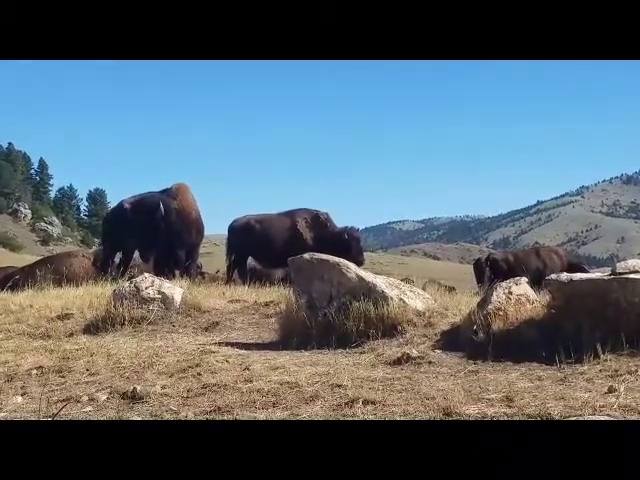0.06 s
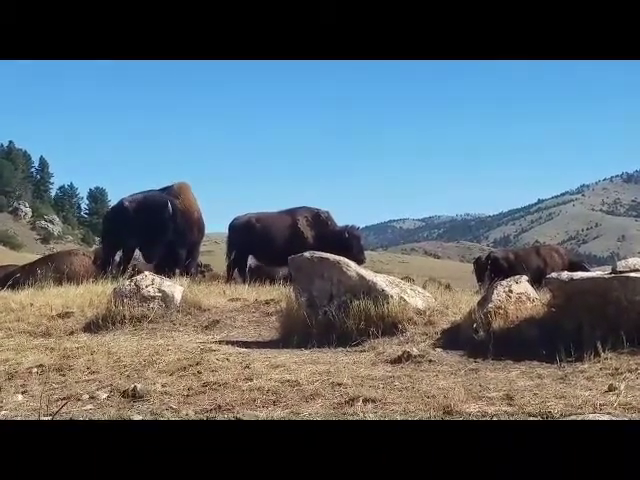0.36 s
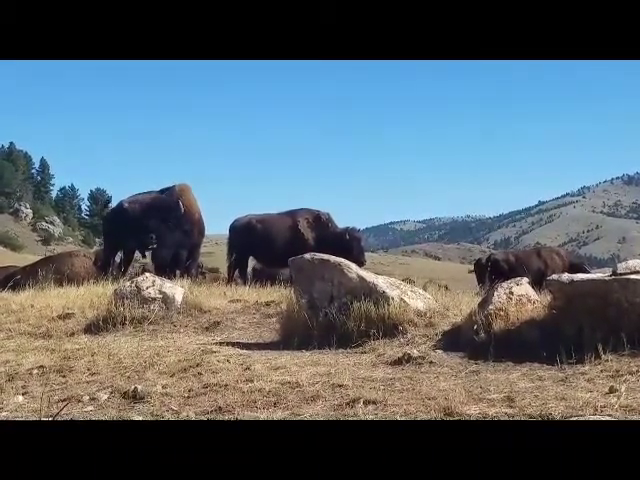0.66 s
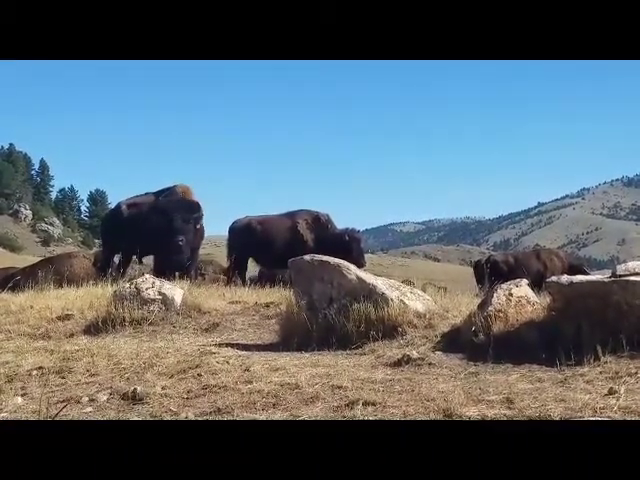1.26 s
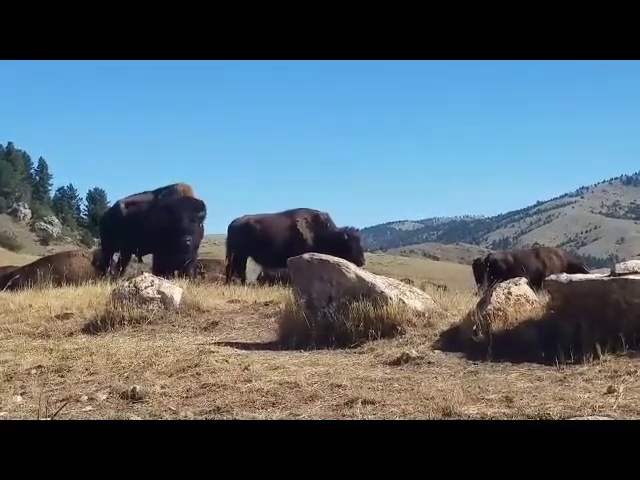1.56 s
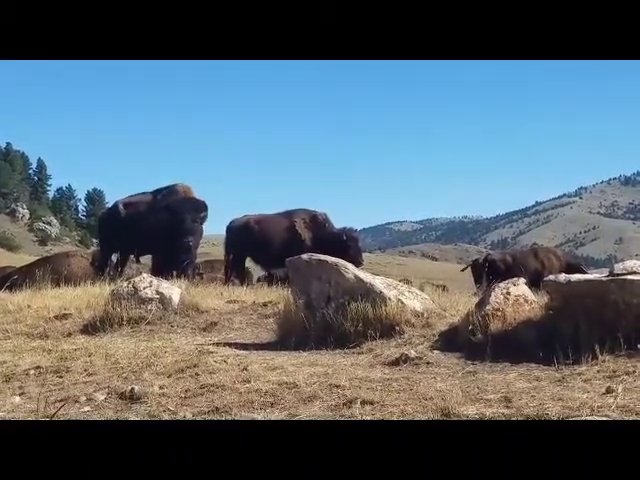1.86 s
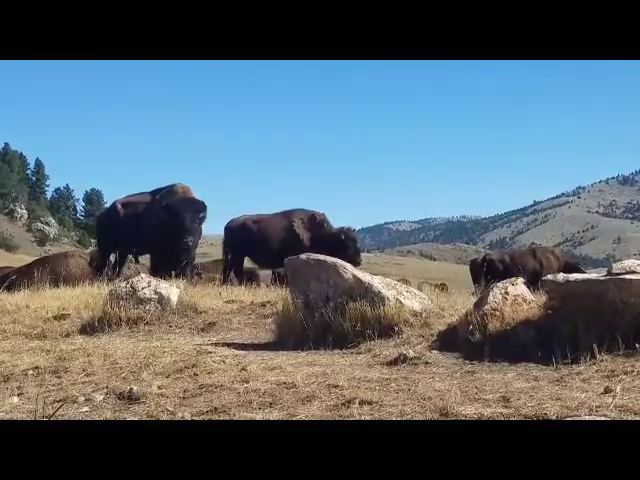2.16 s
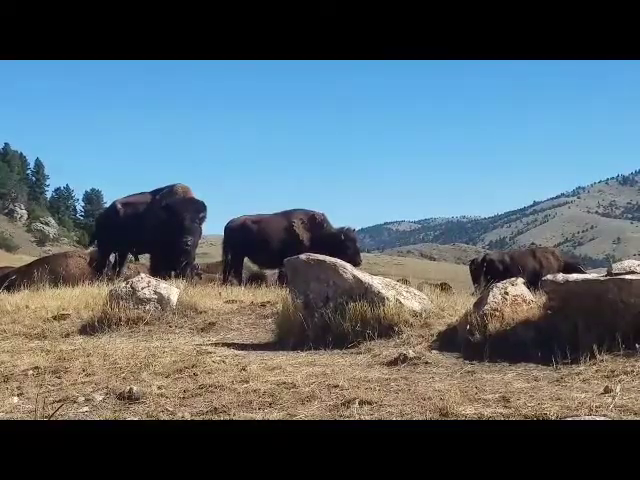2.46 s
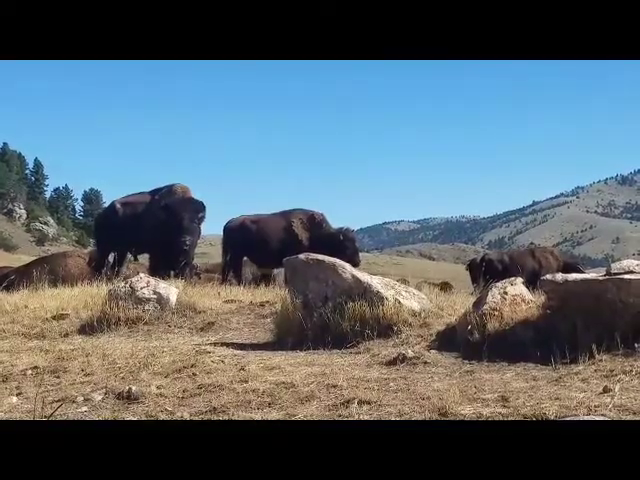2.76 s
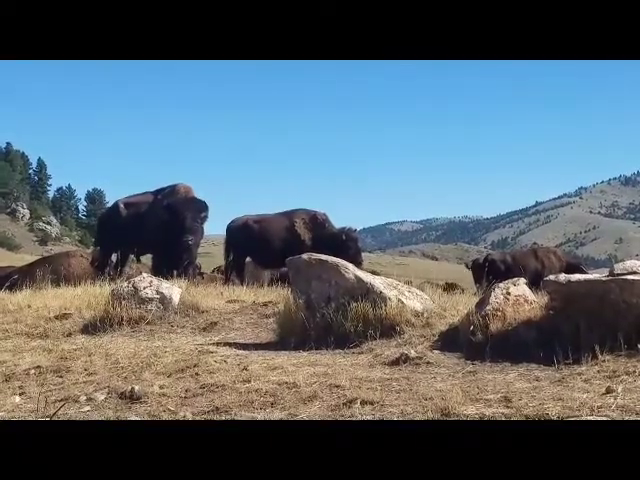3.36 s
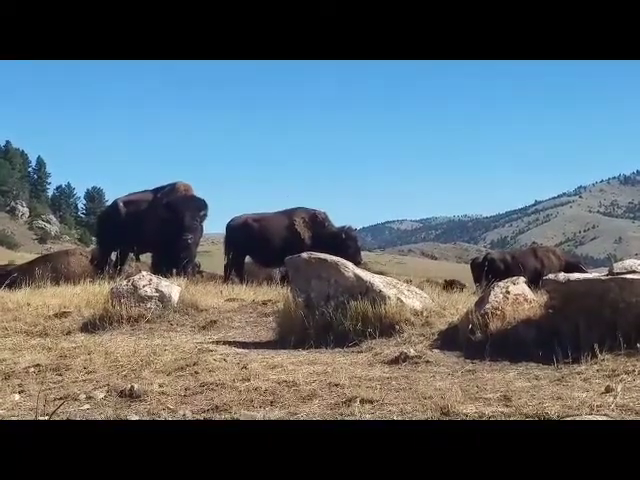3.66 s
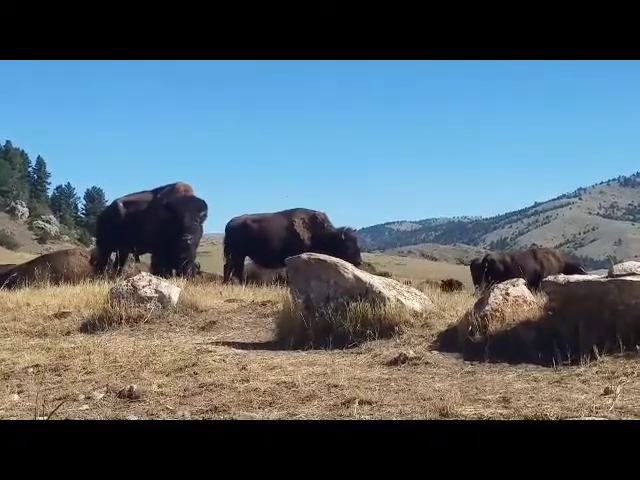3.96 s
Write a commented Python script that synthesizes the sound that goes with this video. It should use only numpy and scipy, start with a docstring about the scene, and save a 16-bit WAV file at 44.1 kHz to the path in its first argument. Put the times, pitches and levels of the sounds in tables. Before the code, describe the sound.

A bison bellows loudly, a low rough roar that rattles and fades. It draws breath with a soft purr, then gives a weaker grunt. A dull tap follows, over faint outdoor hiss with little echo.

```python
"""Bison bull on open grassland.

Slow, hard larynx pulses ring in his long throat. The roar starts even, breaks into a rattle and
fades as the mouth closes; he draws air with a low purr, then grunts.
The ground scatters the sound; faint air, hiss and a few soft knocks lie underneath."""
import sys
import numpy as np
from scipy import signal
from scipy.fft import rfft, irfft
from scipy.io import wavfile
from scipy.ndimage import uniform_filter1d

SR = 44100
rng = np.random.default_rng(int(sys.argv[2]) if len(sys.argv) > 2 else 0)


def put_to_file(sound):
    """Save the sound as 16-bit audio at rate SR, in the file named by the first command-line argument."""
    columns = np.atleast_2d(sound).T  # one column per channel
    safe = np.clip(columns, -1, 1)
    whole_steps = np.round(safe * 32767)
    wavfile.write(sys.argv[1], SR, whole_steps.astype(np.int16))


N = 176400
TIME_S = np.arange(N) / SR
FFT_SIZE = 2 * N
BINS_HZ = np.maximum(np.arange(N + 1) * SR / FFT_SIZE, 1)
SIDES = np.array([[1], [-1]])  # left, right
RING_S, SHIMMER_DB = .12, 2.4
RING_TIME_S = np.arange(int(RING_S * SR)) / SR

# Larynx rate in the roar. Each row: time in seconds, pulses per second.
ROAR_PULSE_RATE = [(0.0075, 73.0), (0.18, 76.86), (0.198, 45.93), (0.28, 55.3), (0.36, 47.41),
                   (0.44, 42.97), (0.49, 55.7), (0.64, 54.91), (0.73, 49.1), (0.78, 60.29), (0.86, 37.87),
                   (1.05, 20.71)]


def roar():
    """Even pulses break into a rattle with hard cracks."""
    # Each row: time in seconds, boom in dB, rasp in dB, air in dB.
    levels = [(0.008, -42, -49, -53), (0.076, -39, -43.5, -61.5), (0.184, -37.5, -37, -53),
              (0.213, -53, -45.5, -62.5), (0.256, -39.5, -44.5, -50.5), (0.285, -50.5, -47, -56.5),
              (0.315, -48.5, -45, -54), (0.349, -37.5, -41.5, -52.5), (0.372, -48.5, -47.5, -50.5),
              (0.411, -39.5, -40, -47.5), (0.44, -42, -44.5, -48), (0.499, -38, -40, -43.5),
              (0.535, -36, -37, -46.5), (0.6, -32, -35, -43.5), (0.662, -33, -39.5, -41.5),
              (0.72, -34, -39.5, -48), (0.745, -30, -43, -42), (0.774, -34.5, -48, -46.5),
              (0.812, -35, -52.5, -46), (0.853, -50.5, -51.5, -43), (1.043, -70.5, -93, -69)]
    # Pulse unevenness. Each row: time in seconds, roughness 0-1.
    roughness = [(.19, .15), (.22, .9), (.48, .9), (.54, .6), (.9, .7)]
    # Rushing air. Each row: frequency in Hz, density in dB.
    air_colour = [(100, 6.5), (350, 11.5), (780, 5), (1800, 1), (2150, 12), (2550, -2.5), (2850, -6.5),
                  (3080, 4.5), (3350, -20), (3700, -2), (4900, -6.5), (6200, -13), (15000, -31)]
    # Accented pulses. Each row: time in seconds, boost in dB.
    cracks = [(0.2547, 3), (0.3092, 3.5), (.411, 1.5), (0.4599, 5), (0.534, 3.5), (0.5697, 3), (0.7401, 4)]
    return voice(ROAR_PULSE_RATE, levels, roar_throat, lambda s: at_time(roughness, s)[0],
                 air_colour, snap_db=-10, cracks=cracks)


def roar_throat(s):
    """Open throat fades into closing throat: the boom sinks, the ring above it rises."""
    # Resonances, both tables. Each row: frequency in Hz, width in Hz, level in dB.
    open_throat = [(221.4, 19.5, 7.5), (336, 165, -10), (635, 13, 12), (942, 55, 1), (1181, 163, 3.5),
                   (1302, 128, 5.5), (1490, 130, -8), (2230, 140, -15.5), (2451, 60, -3), (2662, 36, -12),
                   (2956, 48, -15)]
    closing_throat = [(211, 24.7, 11.5), (353, 120, -8.5), (637, 67, 8), (874, 63, 8.5), (1243, 240, 7),
                      (1637, 27, -7), (2220, 180, -5), (2340, 270, -6.5), (2980, 54, -53), (3730, 160, -8),
                      (4200, 210, -14)]
    # Each row: time in seconds, boom pitch ratio, ring pitch ratio.
    glide = [(.66, 1.1, 0.74), (.77, 1, 1.53), (.84, 0.96, 1.38), (.89, .8, 2.7)]
    closed = np.interp(s, [.673, .721], [0, 1])
    gliding = np.array(closing_throat, float)
    gliding[[0, 2], 0] *= at_time(glide, s)
    return [(1 - closed, open_throat), (closed, gliding)]


def nasal_ring():
    """The roar's pulses drive one narrow nasal resonance that rises as the mouth closes."""
    # Each row: time in seconds, pitch in Hz, level in dB.
    contour = [(.62, 425, -62), (.68, 450, -48), (.735, 478, -41), (.78, 486, -45), (.83, 515, -44),
               (.88, 520, -55), (.93, 520, -75)]
    width_hz = 26
    hz, db = at_time(contour, TIME_S)
    times_s = pulse_times(ROAR_PULSE_RATE)
    clicks = np.zeros(N)
    clicks[(times_s * SR).astype(int)] = from_db(SHIMMER_DB * rng.standard_normal(len(times_s)))
    carrier = np.exp(2j * np.pi * np.cumsum(hz) / SR)
    pole = np.exp(-np.pi * width_hz / SR)
    tone = (signal.lfilter([1], [1, -pole], clicks / carrier + 1e-18) * carrier).imag
    levelled = tone / np.sqrt(uniform_filter1d(tone ** 2, size=1800) + 1e-3)
    return levelled * from_db(db) * (TIME_S > contour[0][0])


def purr():
    """Indrawn air with soft, uneven pulses through a steady throat."""
    # Each row: time in seconds, pulses per second.
    rate = [(1.2988, 40.49), (1.56, 38.21), (1.63, 52.55), (1.71, 40.36), (1.8, 30.19), (2.09, 21.71)]
    # Each row: time in seconds, boom in dB, rasp in dB, air in dB.
    levels = [(1.299, -65.5, -96, -66.5), (1.39, -72, -78, -61.5), (1.48, -68, -82.5, -62),
              (1.55, -58.5, -74, -61), (1.585, -62, -74, -66.5), (1.635, -58, -73, -61),
              (1.665, -52.5, -66.5, -63), (1.8, -58, -71, -67), (1.922, -58.5, -71, -70),
              (2.083, -71.5, -87, -76)]
    # Resonances. Each row: frequency in Hz, width in Hz, level in dB.
    throat = [(213, 17.5, 6.5), (96, 33, -4.5), (375, 190, -3), (620, 28, 0.5), (930, 130, -14),
              (1670, 130, -6.5), (2190, 56, 3), (2520, 170, -5)]
    # Rushing air. Each row: frequency in Hz, density in dB.
    air_colour = [(60, 10), (190, 9), (330, 7), (520, -9), (650, 7), (1250, -15.5), (1730, 6), (1900, -7),
                  (2450, -3.5), (3100, -12.5), (15000, -35)]
    return voice(rate, levels, throat_at=lambda s: [(.86, throat)], roughness_at=lambda s: 1,
                 air_colour=air_colour, snap_db=-25)


def grunt():
    """A short swell of nearly even pulses."""
    # Each row: time in seconds, pulses per second.
    rate = [(2.4578, 66.31), (2.53, 59.55), (2.62, 59.76), (2.73, 45.98), (2.785, 31.13), (2.82, 40.36),
            (2.97, 42.18), (3.13, 41.72)]
    # Each row: time in seconds, boom in dB, rasp in dB, air in dB.
    levels = [(2.458, -69, -79, -77), (2.473, -67, -67, -73), (2.488, -56.5, -65.5, -66),
              (2.52, -56, -63, -78), (2.587, -46.5, -51.5, -61), (2.673, -42.5, -48.5, -58),
              (2.753, -50.5, -55, -59), (2.779, -55, -64.5, -56), (2.81, -48.5, -64, -56.5),
              (2.835, -70, -69.5, -59.5), (2.911, -63.5, -95, -69), (3.124, -71, -94, -80.5)]
    # Rushing air. Each row: frequency in Hz, density in dB.
    air_colour = [(100, -10), (400, 18.5), (750, -2.5), (2150, 6.5), (2800, -3), (3550, -1), (4250, 3),
                  (4800, -8), (15000, -43)]
    return voice(rate, levels, grunt_throat, roughness_at=lambda s: .2,
                 air_colour=air_colour, snap_db=-10.5)


def grunt_throat(s):
    """The boom rises as the grunt swells, then dulls to a flutter behind a shut mouth."""
    # Resonances, both tables. Each row: frequency in Hz, width in Hz, level in dB.
    open_throat = [(232.6, 31, 8), (134, 87, -23), (362, 35, 3.5), (567, 32, 4.5), (924.6, 20, 13),
                   (1207, 115, 2.5), (1460, 31, 0), (2010, 150, -4), (2405, 220, -9.5), (3143, 48, -6),
                   (3550, 120, -22), (4150, 86, -13.5)]
    shut_throat = [(97, 66, 2.5), (242, 230, -8.5), (425, 160, 2), (950, 340, -12), (2190, 440, -18)]
    # Each row: time in seconds, boom pitch ratio.
    glide = [(2.48, .87), (2.65, .99)]
    shut = np.interp(s, [2.82, 2.87], [0, 1])
    gliding = np.array(open_throat, float)
    gliding[:2, 0] *= at_time(glide, s)[0]
    return [(1 - shut, gliding), (shut, shut_throat)]


def voice(rate, levels, throat_at, roughness_at, air_colour, snap_db, cracks=()):
    """Each larynx pulse snaps, rings the throat and releases a puff of air."""
    # High ring of the hardest pulses. Each row: frequency in Hz, width in Hz, level in dB.
    edge_modes = [(3880, 110, -8), (5080, 250, -12), (4910, 200, -7.5)]
    # Notches between throat resonances. Each row: frequency in Hz, width in Hz.
    hollows = [(785, 64), (1790, 240)]
    jitter_s, detune_spread, puff_s = .0005, .022, .005
    slap_db, edge_db, edge_reference_db = -1, -21, -34.5
    boom, rasp, slaps, edge, puffs = np.zeros((5, N + SR))
    times_s = pulse_times(rate)
    onset = from_db(snap_db) * snap()
    boosts_db = np.zeros(len(times_s))
    for s, db in cracks:
        nearest = np.argmin(abs(times_s - s))
        times_s[nearest], boosts_db[nearest] = s, db
    for s, boost_db in zip(times_s, boosts_db):
        roughness, chance = roughness_at(s), rng.standard_normal(16)
        start = int(max(s + jitter_s * roughness * chance[0], 0) * SR)
        span = slice(start, start + len(RING_TIME_S))
        period_samples = SR / at_time(rate, s)[0]
        # A rough cycle has a second, thinner slap near its middle.
        slap_start = start + int(period_samples * rng.uniform(.3, .7))
        slap_gain = roughness * from_db(slap_db + SHIMMER_DB * chance[-1])
        boom_db, rasp_db, _ = at_time(levels, s)
        accent_db = boost_db or SHIMMER_DB * roughness * chance[1]
        detune = 1 + detune_spread * roughness * chance[2:]
        for share, throat in throat_at(s):  # first two resonances boom, the rest rasp
            gain = np.sqrt(share * period_samples)
            boom[span] += gain * from_db(boom_db + accent_db / 2) * ring(throat[:2], detune)
            upper = gain * from_db(rasp_db) * ring(throat[2:], detune[2:])
            rasp[span] += from_db(accent_db) * upper
            slaps[slap_start:slap_start + len(upper)] += slap_gain * upper
        effort_db = rasp_db + accent_db
        force = np.sqrt(period_samples) * from_db(effort_db)
        rasp[span] += force * onset
        edge_gain = roughness * from_db(edge_db + effort_db - edge_reference_db)
        edge[span] += force * edge_gain * ring(edge_modes, detune)
        puffs[span] += from_db(accent_db / 2) * np.exp(-RING_TIME_S / puff_s)
    for hz, width_hz in hollows:
        rasp = signal.lfilter(*signal.iirnotch(hz, hz / width_hz, fs=SR), rasp)
    rasp += cut(slaps, 2200, "high")
    pulses = cut(boom, 635, "low") + cut(rasp, 4850, "low", order=4) + edge
    return cut(pulses[:N], 95, "high", order=4) + breath(rate, levels, air_colour, puffs[:N])


def pulse_times(rate):
    """Larynx pulse times in seconds, each one period after the last."""
    times_s = [rate[0][0]]
    while times_s[-1] < rate[-1][0]:
        times_s.append(times_s[-1] + 1 / at_time(rate, times_s[-1])[0])
    return np.array(times_s[:-1])


def ring(resonances, detune):
    """Damped resonances after one pulse; unit energy."""
    hz, width_hz, db = np.transpose(resonances)[:, :, None]
    signs = (-1) ** np.arange(len(hz))[:, None]
    envelopes = from_db(db) * width_hz * np.exp(-np.pi * width_hz * RING_TIME_S)
    tones = np.sin(2 * np.pi * hz * detune[:len(hz), None] * RING_TIME_S)
    out = np.sum(signs * envelopes * tones, axis=0)
    return out / np.sqrt(np.sum(out ** 2))


def snap():
    """Pulse onset: a few cycles sweep upward and die; unit energy."""
    length_s, from_hz, to_hz = .0037, 545, 3113
    progress = np.minimum(RING_TIME_S / length_s, 1)
    cycles = RING_TIME_S * (from_hz + (to_hz - from_hz) * progress / 2)
    out = progress * (1 - progress) ** 2 * np.sin(2 * np.pi * cycles)
    return -out / np.sqrt(np.sum(out ** 2))


def breath(rate, levels, colour, puffs):
    """Air rushes through the throat in puffs on top of a steady flow."""
    voiced = (TIME_S > rate[0][0] - .02) & (TIME_S < rate[-1][0])
    steady = .35 * uniform_filter1d(voiced.astype(float), size=1500)
    flow = from_db(at_time(levels, TIME_S)[2]) * (puffs + steady)
    return rms_one(shaped(rng.standard_normal(N), from_db(by_hz(colour)))) * flow


def grassland(x):
    """Direct sound, quick scatter from ground and rocks, and a faint thin tail from the slopes."""
    # Each row: frequency in Hz, left minus right in dB.
    balance = [(60, -8.5), (130, -1.5), (260, -2.5), (380, -2.5), (550, 4), (1140, -6.5), (1650, -1),
               (3440, -4.5), (4970, 0.5), (15000, 7)]
    # Tail spectra, both tables. Each row: frequency in Hz, gain in dB.
    scatter_colour = [(100, -14), (250, -13), (600, 5), (1200, 3), (2400, 2.5), (5000, -3), (12000, 6)]
    far_colour = [(230, -22), (600, -5.5), (1100, -2.5), (2200, 7), (5000, -10)]
    lag_s = np.array([[0], [.00007]])
    paths = from_db(SIDES * by_hz(balance) / 2) * np.exp(-2j * np.pi * BINS_HZ * lag_s)
    for db, t60_s, colour in ((-7.5, .11, scatter_colour), (-23.5, .92, far_colour)):
        decay = from_db(-60 * np.minimum(TIME_S / t60_s, 2)) * (TIME_S > .002)
        tail = rms_one(rng.standard_normal((2, N)) * decay) / np.sqrt(N)
        paths += rfft(tail, FFT_SIZE) * from_db(db + by_hz(colour))
    return shaped(x, paths)


def knocks():
    """Dull nearby taps that die within a cycle or two."""
    # Each row: start in seconds, level in dB, pitch in Hz, width in Hz.
    taps = [(3.538, -55, 765, 200), (3.552, -53, 740, 250), (3.643, -35, 480, 755),
            (3.968, -45.5, 500, 600)]
    out = np.zeros(N)
    for start_s, db, hz, width_hz in taps:
        age_s = np.clip(TIME_S - start_s, 0, RING_S)
        out -= from_db(db) * np.exp(-np.pi * width_hz * age_s) * np.sin(2 * np.pi * hz * age_s)
    return cut(out, 1800, "low")


def distant_air():
    """Faint, wide noise with a fluttering low rumble."""
    # Each row: frequency in Hz, density in dB.
    colour = [(15, -38.5), (25, -16.5), (71, 1), (101, -9.5), (129, -1), (188, -11.5), (239, -8.5),
              (420, -5.5), (468, -8.5), (612, -7.5), (993, -12), (1940, -13), (6520, -29.5), (15400, -23.5)]
    # Each row: frequency in Hz, left-right correlation.
    correlation = [(60, 0.63), (180, 0.75), (550, 0.023), (1650, -0.4), (4970, 0.17), (15000, -0.36)]
    level_db, flutter_db = -66.5, 2
    alike = by_hz(correlation)
    mid_side_gain = from_db(by_hz(colour)) * np.sqrt([1 + alike, 1 - alike])
    mid, side = shaped(rng.standard_normal((2, N)), mid_side_gain)
    air = from_db(level_db) * rms_one(mid + side * SIDES)
    flutter = rms_one(cut(rng.standard_normal(N), 2.2, "low"))
    return air + cut(air, 1300, "low", order=1) * (from_db(flutter_db * flutter) - 1)


def hiss():
    """Fine treble noise, strongest during roar and grunt."""
    # Each row: time in seconds, level in dB.
    levels = [(0, -70.5), (.85, -68), (1.05, -74), (1.8, -73), (2.3, -79), (2.7, -68.5), (3.1, -80),
              (4, -77)]
    # Each row: frequency in Hz, density in dB.
    colour = [(3000, -19), (7000, -11), (10000, -21), (12500, -7.5), (15000, -8)]
    noise = rms_one(shaped(rng.standard_normal((2, N)), from_db(by_hz(colour))))
    return noise * from_db(at_time(levels, TIME_S)[0])


def from_db(db):
    """Decibels to gain."""
    return 10 ** (np.asarray(db) / 20)


def rms_one(x):
    """Scale to rms 1."""
    return x / np.sqrt(np.mean(x ** 2) + 1e-20)


def at_time(rows, s):
    """Each value column, interpolated at s seconds."""
    times_s, *columns = np.transpose(rows)
    return [np.interp(s, times_s, column) for column in columns]


def by_hz(points):
    """A spectrum table at every bin, interpolated in log frequency."""
    hz, value = np.transpose(points)
    return np.interp(np.log(BINS_HZ), np.log(hz), value)


def shaped(x, gain):
    """Filter by one gain per bin."""
    return irfft(rfft(x, FFT_SIZE) * gain, FFT_SIZE)[..., :N]


def cut(x, hz, kind, order=2):
    """Low-pass or high-pass."""
    return signal.sosfilt(signal.butter(order, hz, kind, fs=SR, output="sos"), x + 1e-18)


def scene():
    """The bull on the plain, over knocks, air and hiss."""
    bull = roar() + purr() + grunt() + nasal_ring()
    return grassland(bull) + knocks() + distant_air() + hiss()


def record(dry):
    """Steep low-pass."""
    cutoff_hz = 15550
    return shaped(dry, 1 / np.sqrt(1 + (BINS_HZ / cutoff_hz) ** 600))


dry = scene()
out = record(dry)
put_to_file(out)
```